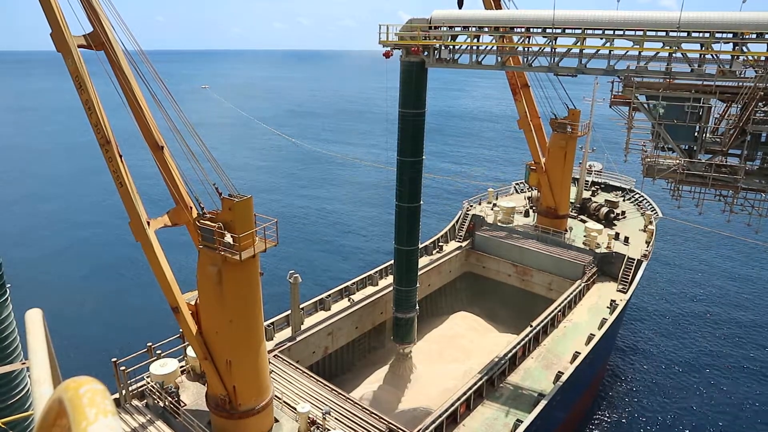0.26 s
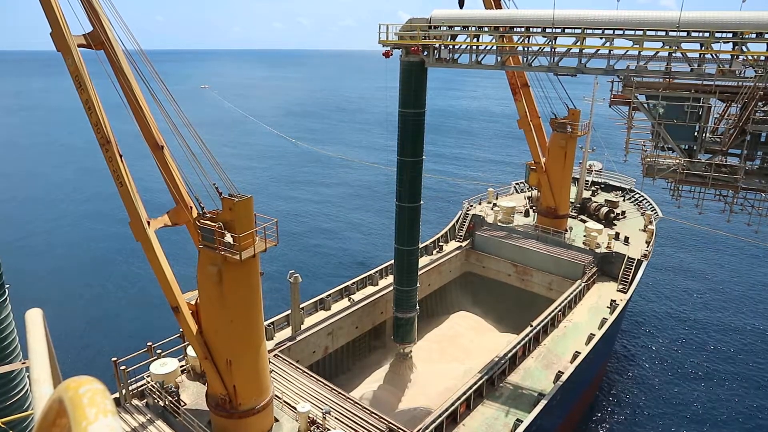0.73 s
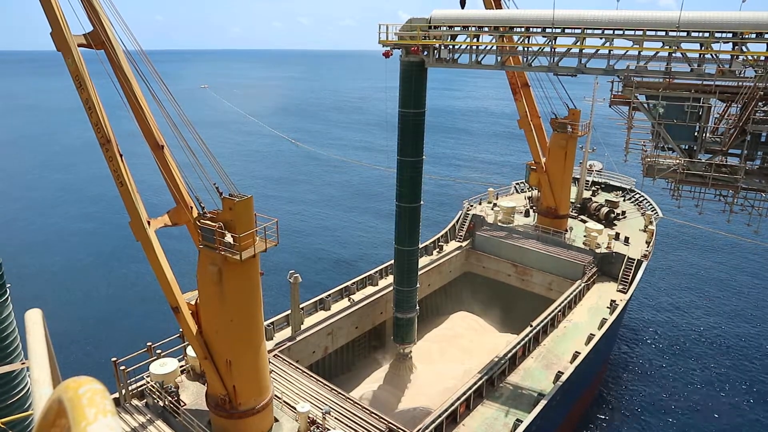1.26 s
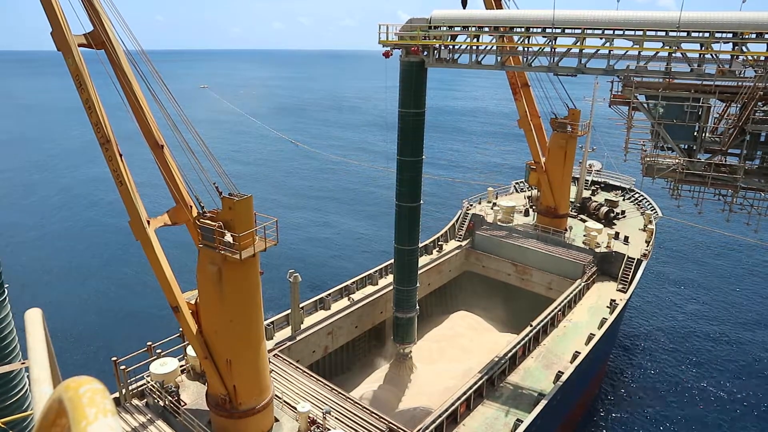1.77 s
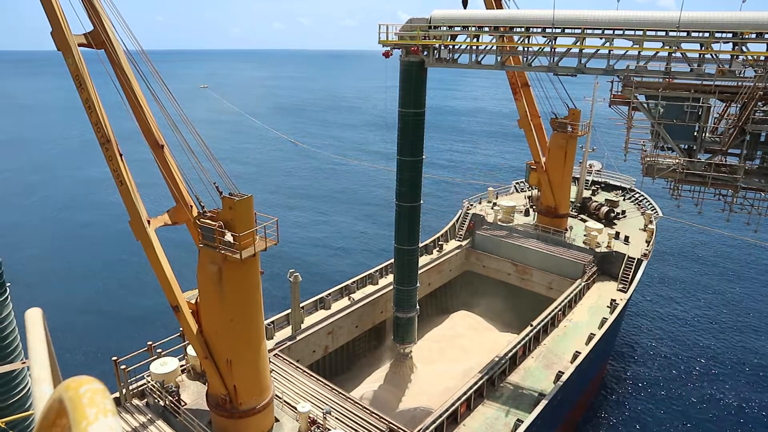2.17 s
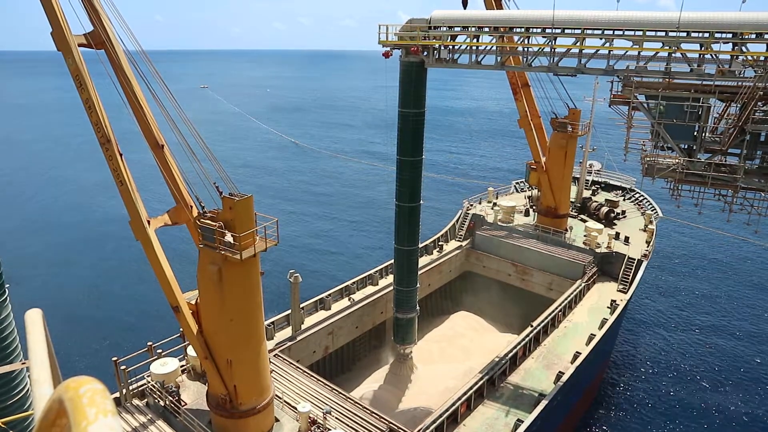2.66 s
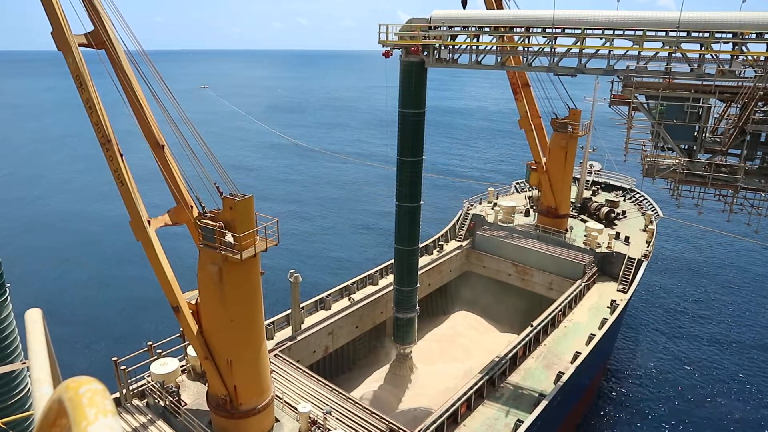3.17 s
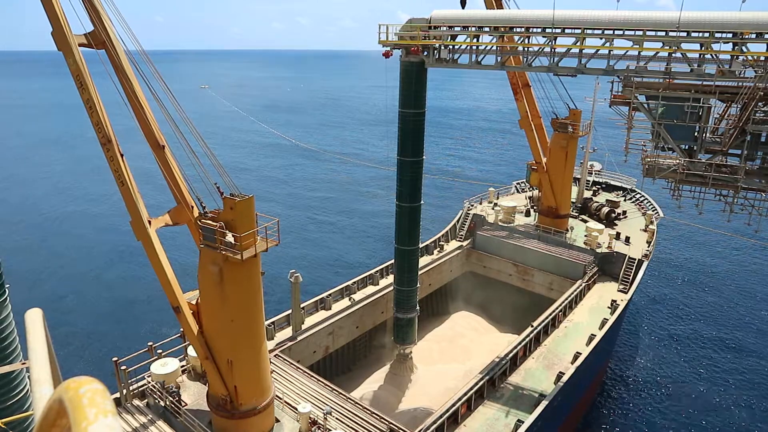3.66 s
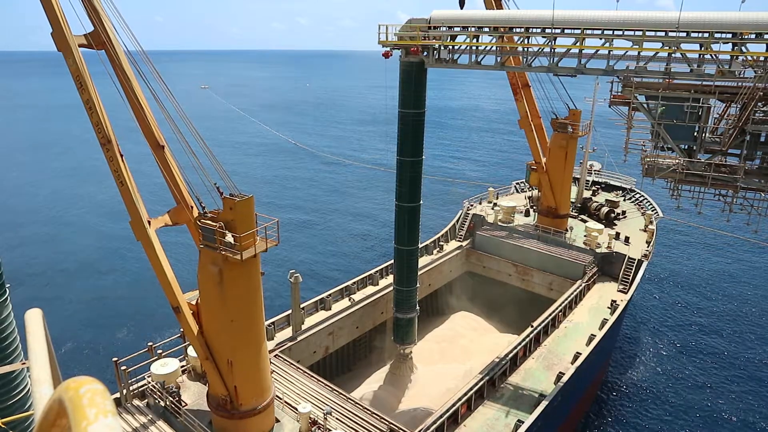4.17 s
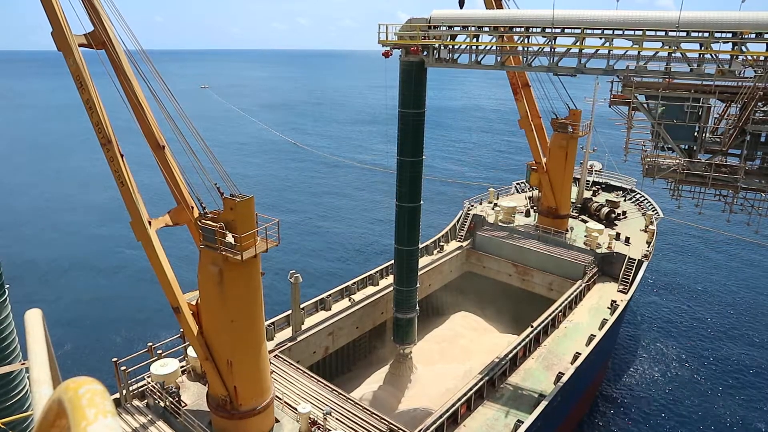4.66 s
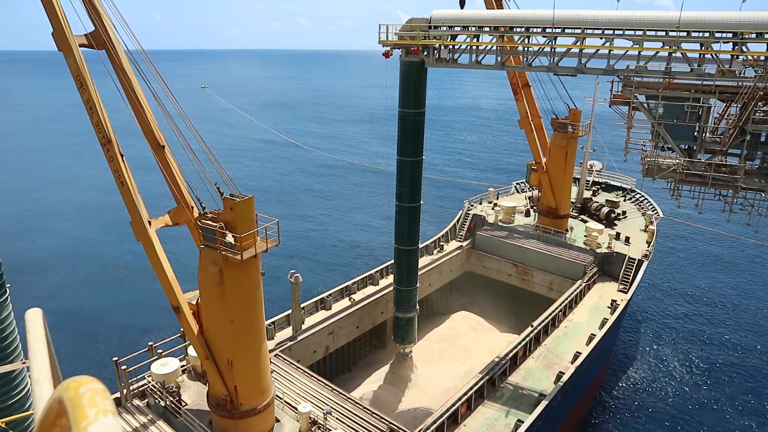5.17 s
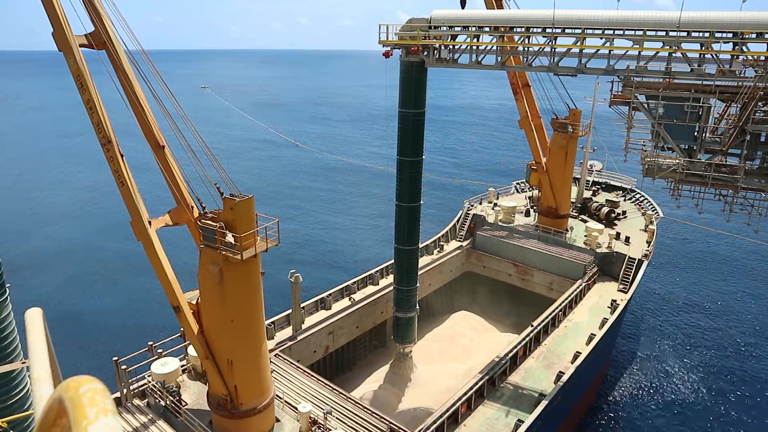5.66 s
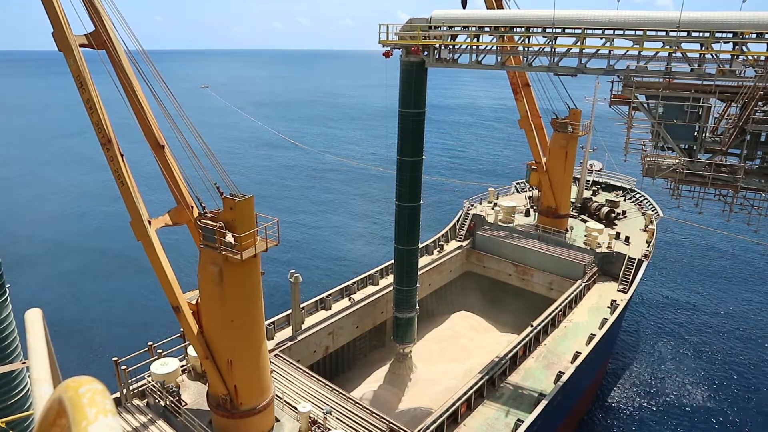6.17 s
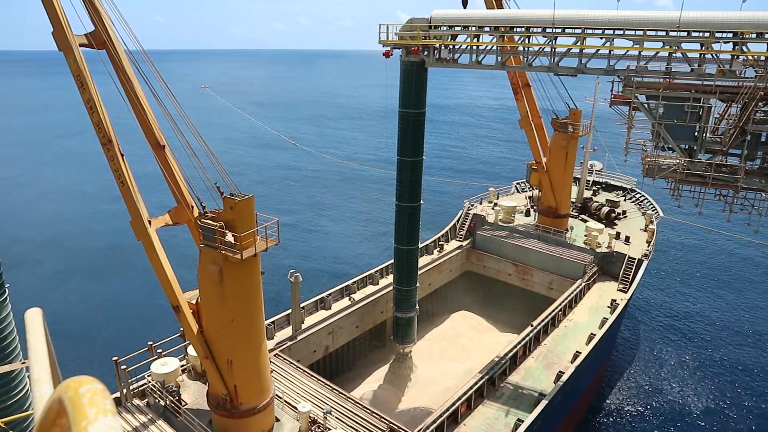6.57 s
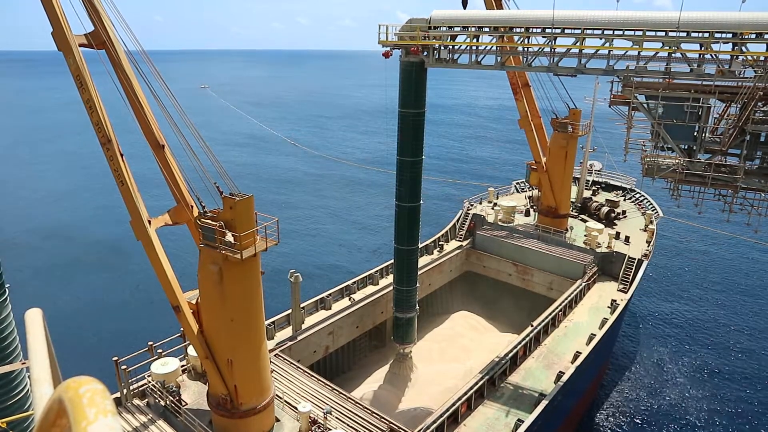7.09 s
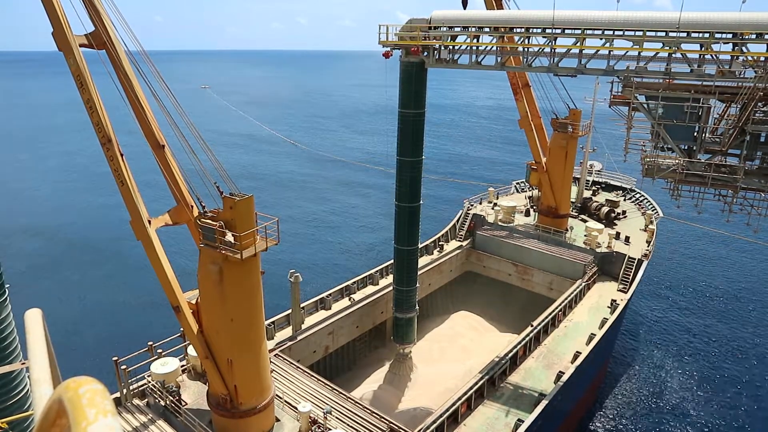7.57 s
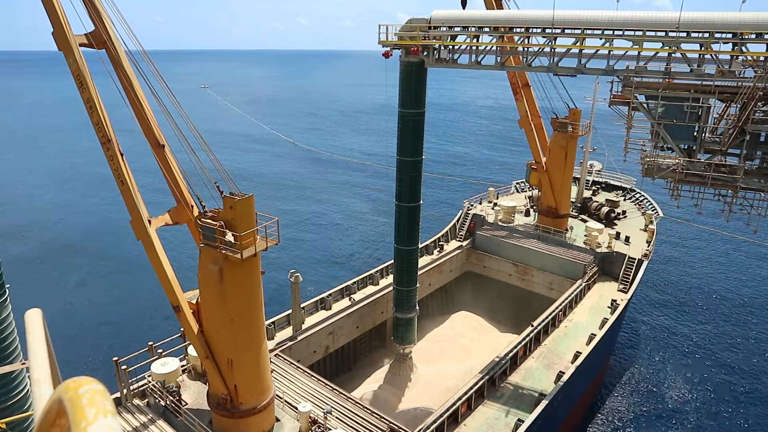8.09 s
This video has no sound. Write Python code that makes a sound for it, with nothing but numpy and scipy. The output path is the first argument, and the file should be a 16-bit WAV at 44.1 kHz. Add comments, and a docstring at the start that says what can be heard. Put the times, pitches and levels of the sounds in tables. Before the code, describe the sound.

Strong wind buffets the microphone, then eases to reveal a steady dense rush of grain pouring into a steel ship's hold, before gusts return.

```python
"""A shiploader pours bulk cargo down a chute into a steel hold, heard from high above the deck, 8.3 s.
Throughout, band-coloured grain impacts rush and ring in resonances over a conveyor drone and faint squeal.
Gusts of turbulence noise, buffets and eddy slaps open the scene and die to a light breeze by about 2.5 s.
Stray grains excite steel modes from 2.7 to 6.8 s; buffets return near 5.8 s, full gusts from 7.3 s.
The recorder's gain control turns down under strong wind, so the rush sinks, then swells back slowly."""
import sys
import numpy as np
from scipy import signal
from scipy.io import wavfile
from scipy.ndimage import uniform_filter1d

SR = 44100
rng = np.random.default_rng(int(sys.argv[2]) if len(sys.argv) > 2 else 0)


def wrap_up_sound(samples):
    """Save the sound to the file named by the first command line argument, as 16-bit audio."""
    columns = np.atleast_2d(samples).T
    # keep every value between -1 and 1, then stretch to whole-number steps
    tamed = np.clip(columns, -1, 1)
    steps = np.round(tamed * 32767).astype(np.int16)
    wavfile.write(sys.argv[1], SR, steps)


N = 367353
TIME = np.arange(N) / SR
REFERENCE_EDDY_HZ = 500


def from_db(db):
    """Decibels to amplitude gain."""
    return np.exp(np.asarray(db) * (np.log(10) / 20))


def rms_one(x):
    """Scale to rms 1."""
    return x / np.sqrt(np.mean(x ** 2) + 1e-20)


def in_time(points):
    """Read a curve at every sample."""
    time_s, value = np.transpose(points)
    return np.interp(TIME, time_s, value)


def at_hz(points, hz):
    """Read a spectrum on a log-frequency axis."""
    f, value = np.transpose(points)
    return np.interp(np.log(hz), np.log(f), value)


def drift(rate_per_s):
    """Smooth random curve, rms 1, that changes about rate_per_s times a second."""
    step = 40  # samples between computed points
    r = np.exp(-2 * np.pi * rate_per_s * step / SR)
    noise = rng.standard_normal(N // step + 2002)
    slow = signal.lfilter([1], [1, -2 * r, r * r], noise)[2000:]  # drop the filter's run-in
    return np.interp(np.arange(N) / step, np.arange(len(slow)), rms_one(slow))


def swell_of(start_s, length_s, attack_s, release_s):
    """Rounded attack, hold and release, from 0 to 1."""
    age = TIME - start_s
    ramp = np.minimum(age / attack_s, (length_s - age) / release_s)
    return np.sin(np.pi / 2 * np.clip(ramp, 0, 1))


def cut(x, hz, kind, order):
    """Butterworth low-, high- or band-pass."""
    sos = signal.butter(order, hz, kind, fs=SR, output="sos")
    return signal.sosfilt(sos, x + 1e-18)


def bands(sources, edges_hz):
    """Yield (centre Hz, width Hz, band); neighbouring bands draw on unrelated sources."""
    for k, (low, high) in enumerate(zip(edges_hz, edges_hz[1:])):
        sos = signal.butter(2, [low, high], "band", fs=SR, output="sos")
        band = signal.sosfilt(np.vstack([sos, sos]), sources[k % 2])
        yield np.sqrt(low * high), high - low, band


def resonate(x, hz, width_hz, lift_db):
    """Lift (or dip) a band by a two-pole resonance."""
    r = np.exp(-np.pi * width_hz / SR)
    zeros = np.array([1, 0, -1]) * (1 - r * r) / 2
    poles = [1, -2 * r * np.cos(2 * np.pi * hz / SR), r * r]
    return x + (from_db(lift_db) - 1) * signal.lfilter(zeros, poles, x)


def ring(clicks, hz, t60_s):
    """Decaying two-pole mode: a unit click sets a sine of height 1 ringing."""
    r = np.exp(-np.log(1000) / (t60_s * SR))
    w = 2 * np.pi * hz / SR
    return signal.lfilter([0, np.sin(w)], [1, -2 * r * np.cos(w), r * r], clicks + 1e-18)


def rumble(fade_s, lump_db, lumps_per_s):
    """Eddies larger than the microphone press on both ports alike, in spells of random lumps."""
    # slow-eddy colour: freq_hz, gain_db
    colour = [(25, -19.5), (45, -6.5), (70, 1), (100, -1), (150, -1.5), (300, -45), (1000, -100)]
    # thumping spells: start_s, length_s, level_db
    spells = [(-0.4, 2.2, -34), (3.296, 1.5, -38.5), (4.912, 2.45, -38.5)]
    edges_hz = 20 * 2 ** np.arange(0, 4.1, .5)
    noise = 0
    for hz, width_hz, band in bands(rng.standard_normal((2, N)), edges_hz):
        noise = noise + band * from_db(at_hz(colour, hz))
    strength = 0
    for start_s, length_s, level_db in spells:
        strength = strength + from_db(level_db) * swell_of(start_s, length_s, fade_s, fade_s)
    lumps = from_db(lump_db * np.minimum(drift(lumps_per_s), 1))
    return strength * rms_one(noise * lumps)


def airflow(swell_db, swell_per_s):
    """Wind strength and eddy rate: parts add in power, and the strongest dominates the rate."""
    # light breeze between gusts: time_s, level_db
    breeze = [(0, -21.5), (1.65, -14), (2.35, -19.5), (2.55, -17.5), (2.8, -32), (3.35, -27.5),
              (4.0, -49.5), (5.95, -51), (6.15, -21.5), (6.5, -23.5), (6.72, -23), (7.1, -23.5),
              (7.25, -33), (8.3, -25)]
    # gusts: start_s, length_s, attack_s, release_s, level_db, eddy_hz (at full swell and age 0)
    gusts = [(0.098, 1.534, 0.3, 0.12, -0.4, 596), (1.708, 0.5, 0.15, 0.4, 0.5, 467),
             (7.28, 0.69, 0.39, 0.4, -1.5, 437), (8.072, 0.5, 0.27, 0.14, 2, 500)]
    # single buffets: centre_s, level_db, eddy_hz, half_length_s
    buffets = [(0.014, -8.5, 204, 0.035), (0.14, -9, 160, 0.012), (0.164, -3, 330, 0.012),
               (0.186, -1, 426, 0.018), (0.217, -5, 715, 0.032), (0.287, -6, 610, 0.021),
               (0.412, -2, 710, 0.037), (0.516, -2.5, 620, 0.011), (0.603, -3.5, 680, 0.019),
               (0.67, -1.5, 597, 0.009), (1.081, -3, 520, 0.025), (1.183, 3, 553, 0.032),
               (1.283, 1, 480, 0.05), (1.383, 2.5, 485, 0.089), (1.48, 3.5, 480, 0.059),
               (1.558, 0, 350, 0.012), (1.594, -1.5, 376, 0.013), (1.822, -4, 484, 0.012),
               (1.862, 3, 500, 0.017), (1.945, 0, 470, 0.022), (1.997, -1, 560, 0.014),
               (2.026, -6, 340, 0.011), (2.099, -1, 306, 0.035), (2.174, -3.5, 390, 0.02),
               (2.228, -5.5, 277, 0.032), (2.281, -6.5, 297, 0.021), (2.322, -9, 240, 0.009),
               (2.424, -10.5, 220, 0.0084), (2.484, -13, 258, 0.0081), (2.603, -16, 246, 0.016),
               (3.179, -15.5, 220, 0.009), (3.392, -15.5, 222.3, 0.012), (3.69, -23, 75, 0.012),
               (3.848, -21, 60, 0.016), (4.143, -19, 86, 0.028), (4.338, -23, 65, 0.025),
               (4.581, -19.5, 100, 0.018), (5.255, -24, 65, 0.012), (5.35, -25, 65, 0.016),
               (5.775, -22, 80, 0.012), (5.834, -12.5, 189, 0.028), (5.886, -15, 280, 0.02),
               (5.909, -10.5, 280, 0.012), (6.085, -18, 80, 0.014), (6.267, -19.5, 100, 0.016),
               (6.356, -19, 100, 0.011), (6.478, -20, 80, 0.012), (6.595, -16, 100, 0.016),
               (6.647, -10, 190, 0.033), (6.802, -6.5, 185, 0.014), (6.896, -9.5, 170, 0.015),
               (6.927, -6.5, 140, 0.021), (6.979, -11, 229, 0.018), (7.016, -7, 204, 0.02),
               (7.122, -6.5, 206, 0.0094), (7.149, -17, 130, 0.012), (7.322, -7, 300, 0.013),
               (7.362, -5.5, 383, 0.029), (7.409, -3, 397, 0.035), (7.532, -4, 453, 0.051),
               (7.622, -2, 480, 0.008), (7.648, 0, 483, 0.011), (7.768, -7, 380, 0.01),
               (7.863, -9, 300, 0.0057), (7.794, -10.5, 320, 0.082), (7.88, -14, 270, 0.012),
               (7.91, -16, 161, 0.012), (8.002, -16, 270, 0.015), (8.109, -7, 278, 0.008),
               (8.152, -4.5, 430, 0.017)]
    breeze_eddy_hz, sag_oct_per_s = 228, 0.53
    parts = [(from_db(in_time(breeze) + swell_db * drift(swell_per_s)), breeze_eddy_hz)]
    for start_s, length_s, attack_s, release_s, level_db, eddy_hz in gusts:
        age = np.clip(TIME - start_s, 0, length_s)
        swell = swell_of(start_s, length_s, attack_s, release_s)
        sag = 2 ** (-sag_oct_per_s * age)  # a gust grows duller as it blows
        parts.append((from_db(level_db) * swell, eddy_hz * swell ** 0.34 * sag))
    for centre_s, level_db, eddy_hz, half_length_s in buffets:
        puff = np.exp(-1.7 * np.minimum(((TIME - centre_s) / half_length_s) ** 2, 20))
        parts.append((from_db(level_db) * puff, eddy_hz))
    power = sum(strength ** 2 for strength, hz in parts)
    mean_eddy_hz = sum(strength ** 2 * hz for strength, hz in parts) / power
    return np.sqrt(power), mean_eddy_hz


def wind(flutter_db, flutter_per_s, rasp_db, rasp_per_s, patchy_db):
    """Turbulence on the ports: faster air sheds smaller eddies, so the whole spectrum slides up."""
    # eddy colour: multiple_of_eddy_rate, db_per_hz
    eddy_colour = [(.04, -60), (.08, -31.5), (.2, -11.5), (.5, -3.5), (.8, 1.5), (2, 4), (3, -2.5),
                   (4, -7.5), (6, -20), (8, -32), (16, -65.5), (40, -110)]
    # port difference at the reference eddy rate: freq_hz, side_re_mid_db
    side_share = [(150, -70), (400, -36.5), (700, -22.5), (1000, -13), (2000, -2), (3000, 2), (6000, 12.5)]
    # microphone housing: freq_hz, width_hz, lift_db
    housing = [(411, 49, 3.5), (593, 1020, -4)]
    strength, eddy_hz = airflow(swell_db=1.0, swell_per_s=6.3)
    # in slower air the ports differ from a lower pitch on
    side_stretch = (REFERENCE_EDDY_HZ / eddy_hz) ** 0.18
    eddies = np.minimum(drift(rasp_per_s), 1.7)
    edges_hz = np.r_[25, 50, np.geomspace(100, 1130, 8), np.geomspace(1450, 7000, 9), 8800]
    out, total_power = 0, 0
    for hz, width_hz, (mid, side) in bands(rng.standard_normal((2, 2, N)), edges_hz):
        gain = from_db(at_hz(eddy_colour, hz / eddy_hz)) * np.sqrt(width_hz)
        # small eddies come in sharper bursts than large ones
        depth_db = rasp_db * np.sqrt(min(hz / 1000, 2.5))
        bursts = rms_one(from_db(depth_db * eddies + patchy_db * drift(39)))
        side = rms_one(side) * from_db(at_hz(side_share, hz * side_stretch))
        out = out + gain * bursts * (rms_one(mid) + np.array([side, -side]))
        total_power = total_power + gain ** 2
    for hz, width_hz, lift_db in housing:
        out = resonate(out, hz, width_hz, lift_db)
    flutter = from_db(flutter_db * drift(flutter_per_s))
    return strength * flutter * out / np.sqrt(total_power)


def crackles(level_db, decay_s, low_hz, high_hz):
    """Tiny dry snaps within the gusts: decaying noise, different at each port."""
    # snaps: start_s, level_db (before level_db and band-pass)
    snaps = [(.183, -21), (.524, -19), (.535, -24), (.599, -20), (.631, -25), (.709, -29), (.876, -30),
             (1.153, -17), (1.172, -18), (1.329, -18), (1.441, -25.5), (1.943, -21), (2.049, -29)]
    out = np.zeros((2, N))
    age = TIME[:1024]
    for start_s, snap_db in snaps:
        start = int(start_s * SR)
        snap = rng.standard_normal((2, len(age))) * np.exp(-age / decay_s)
        out[:, start:start + len(age)] += from_db(snap_db) * snap
    return from_db(level_db) * cut(out, [low_hz, high_hz], "band", order=2)


def spatter(snaps_per_s, level_db, low_hz, high_hz):
    """Fast air breaks into tiny separate snaps; the harder it blows, the more and the louder."""
    strength, eddy_hz = airflow(swell_db=1.0, swell_per_s=7.7)
    chance = snaps_per_s / SR * strength * (eddy_hz / REFERENCE_EDDY_HZ) ** 2
    snaps = (rng.random(N) < chance) * rng.standard_normal((2, N))
    return from_db(level_db) * cut(strength * snaps, [low_hz, high_hz], "band", order=4)


def slaps(level_db, cycles):
    """A strong eddy slaps the microphone: one short swing of pressure, a sine in a Gaussian envelope."""
    # slaps: centre_s, level_db (before level_db), pitch_hz
    swings = [(.162, -2, 550), (.169, -1, 503), (0.198, 13, 890), (.238, 6, 1200), (0.709, 11.5, 1200),
              (0.976, 8.5, 1150), (1.009, 8.5, 970), (1.156, 9.5, 990), (1.191, 7.5, 420), (1.304, 8, 1200),
              (1.378, 10, 895), (1.458, 11, 906), (1.818, 9, 905), (1.978, 11, 800), (2.181, 4, 700),
              (2.278, 1, 684), (2.922, -6, 480), (3.392, -5.5, 450), (5.843, -6, 396), (5.908, -10, 423),
              (6.803, -4, 300), (6.941, 0.5, 520), (7.018, -2.5, 380), (7.314, -5, 600), (7.348, 2, 600),
              (7.423, 5.5, 703), (7.554, 5, 724), (7.587, 7, 750), (7.621, 7, 836), (7.739, 5.5, 650)]
    out = np.zeros(N)
    for centre_s, swing_db, pitch_hz in swings:
        phase = (TIME - centre_s) * pitch_hz  # cycles
        near = np.abs(phase) < 4
        envelope = np.exp(-(phase[near] / cycles) ** 2)
        out[near] += from_db(swing_db) * np.sin(2 * np.pi * phase[near]) * envelope
    return from_db(level_db) * out


def conveyor(sway_db, sway_per_s):
    """Belt and rollers drone on a few unsteady pitches, narrow noise bands that sway with the load."""
    # drone: freq_hz, width_hz, rms_db
    drone = [(669, 30, -26.4), (1903, 30, -38.8), (2574, 30, -47.3), (3667, 30, -56.5)]
    out = 0
    for hz, width_hz, rms_db in drone:
        wander = drift(width_hz) + 1j * drift(width_hz)
        sway = from_db(sway_db * drift(sway_per_s))
        tone = np.real(wander * np.exp(2j * np.pi * hz * TIME))
        out = out + from_db(rms_db) * rms_one(sway * tone)
    return out


def squeal(pitch_hz, waver_hz, waver_per_s, level_db, sway_db):
    """A roller whistles faintly: a sine wavering in pitch and coming and going."""
    hz = pitch_hz + waver_hz * drift(waver_per_s) + 0.5 * waver_hz * drift(80)
    sway = from_db(sway_db * np.minimum(drift(12), 1.5))
    tone = np.sin(2 * np.pi * np.cumsum(hz) / SR) * sway
    return from_db(level_db) * rms_one(tone)


def stray_grains(level_db, scatter_db, skitter_s, scratch_db):
    """Each grain skitters with a dry scratch and strikes every steel mode at its own strength."""
    # grains: start_s, level_db (before level_db and mode gains)
    grains = [(2.7243, -60), (3.2637, -39), (3.796, -48.5), (4.0978, -39), (4.1566, -41), (4.5732, -38),
              (5.746, -37), (5.955, -27.5), (5.9765, -31), (6.0823, -30.5), (6.369, -36), (6.498, -29),
              (6.7308, -34)]
    # steel modes: freq_hz, gain_db, t60_s
    steel_modes = [(3700, -5.5, 0.004), (4630, 7, 0.005), (5350, 8.5, 0.0065), (5950, 5, 0.006),
                   (6600, 5.5, 0.005), (7500, -1.5, 0.004)]
    out = np.zeros((2, N))
    age = TIME[:2048]
    for start_s, grain_db in grains:
        start = int(start_s * SR)
        span = slice(start, start + len(age))
        contact = rng.standard_normal((2, len(age))) * np.exp(-age / skitter_s)
        contact = contact / np.linalg.norm(contact[0])
        out[:, span] += from_db(grain_db + scratch_db) * cut(contact, 3000, "high", order=2)
        for hz, mode_db, t60_s in steel_modes:
            strike_db = grain_db + mode_db + scatter_db * rng.standard_normal()
            out[:, span] += from_db(strike_db) * ring(contact, hz, t60_s)
    return from_db(level_db) * out


def stream(spectrum, grains_per_s, patchy_db):
    """Countless grain impacts of uneven size, coloured by band, leaning right; stereo, rms 1."""
    # loader stands to the right: freq_hz, right_minus_left_db
    lean = [(1300, 0), (1900, 2.3), (3500, 4), (6000, 1.8), (9000, 0)]
    impacts = (rng.random((2, N)) < grains_per_s / SR) * rng.standard_normal((2, N))
    edges_hz = np.geomspace(25, 17000, 29)
    out = 0
    for hz, width_hz, band in bands(impacts, edges_hz):
        pan = from_db(at_hz(lean, hz) * np.array([[-.5], [.5]]))
        out = out + pan * (band * from_db(at_hz(spectrum, hz) + patchy_db * drift(15)))
    return rms_one(out)


def pour(mid_db, side_db, surge_db, ring_sway_db):
    """Falling cargo surges a little and rings in chute and hold; each resonance comes and goes."""
    # mid part of the rush, added to both channels: freq_hz, db_per_hz (relative)
    mid_spectrum = [(30, -37.5), (65, -14), (130, -5.5), (230, 2), (320, 2.5), (480, 2), (800, -3.5),
                    (1180, -5), (1400, -11.5), (2100, -13), (3000, -21.5), (4200, -27.5), (5300, -36.5),
                    (7800, -42.5), (10500, -99.5)]
    # side part of the rush, added left and subtracted right: freq_hz, db_per_hz (relative)
    side_spectrum = [(200, -33), (400, -51.5), (1400, -37), (1950, 8.5), (3000, 6.5), (4500, 5.5),
                     (7000, 2), (10000, -2.5), (13000, -4), (15500, -2.5)]
    # rush level: time_s, level_db
    rush_level = [(0, -1), (1.7, -0.6), (2.6, -0.6), (3.3, -1.2), (3.8, 0.25), (4.5, -0.5), (5.7, 0),
                  (6.7, -0.5), (7.25, 0), (8.3, -0.5)]
    # chute and hold resonances: freq_hz, width_hz, lift_db (mean)
    resonances = [(337, 45, 0.5), (436, 30, 2.5), (506, 45, 4.5), (556, 17, -1), (835, 48, 8.5),
                  (919, 14, 4), (1040, 25, 4), (1111, 57, 6.5), (1181, 26, 1), (1257, 79, -2),
                  (1642, 32, 6), (1780, 91, 3.5), (1845, 15, 5), (2135, 71, 9), (2320, 30, 4),
                  (2680, 140, 6), (3006, 52, 3), (3110, 150, -1.5), (3404, 110, 7), (3870, 56, 3.5),
                  (4140, 130, 2.5), (4560, 110, 4.5), (4980, 250, -3), (5480, 240, 7.5), (6550, 500, 1.5)]
    ring_sways_per_s = 4
    mid = from_db(mid_db) * stream(mid_spectrum, grains_per_s=9000, patchy_db=1.36)
    side = from_db(side_db) * stream(side_spectrum, grains_per_s=20000, patchy_db=1.3)
    surge = from_db(in_time(rush_level) + surge_db * drift(27))
    out = (mid + side * [[1], [-1]]) * surge
    for hz, width_hz, lift_db in resonances:
        out = resonate(out, hz, width_hz, lift_db + ring_sway_db * drift(ring_sways_per_s))
    return out


def gain_control(x):
    """Recorder gain: turns down quickly above the threshold, then recovers at a steady rate."""
    threshold_db, window_s, attack_s, recovery_db_per_s = -16, 0.078, 0.054, 10.5
    power = uniform_filter1d(np.mean(x ** 2, axis=0), int(window_s * SR))
    level_db = 10 * np.log10(np.maximum(power, 1e-12))
    excess_db = np.maximum(level_db - threshold_db, 0)
    # running maximum on a rising ramp = hold that falls at the recovery rate
    recovered_db = recovery_db_per_s * TIME
    held_db = np.maximum.accumulate(excess_db + recovered_db) - recovered_db
    r = np.exp(-1 / (attack_s * SR))
    reduction_db, _ = signal.lfilter([1 - r], [1, -r], held_db, zi=[r * held_db[0]])
    return x * from_db(-reduction_db)


def scene():
    """Loader below, wind at the microphone."""
    loader = pour(mid_db=-21.0, side_db=-45.5, surge_db=0.4, ring_sway_db=1.2)
    loader = loader + conveyor(sway_db=1.8, sway_per_s=3)
    loader = loader + squeal(pitch_hz=4160, waver_hz=55, waver_per_s=3, level_db=-54.5, sway_db=7)
    ticks = stray_grains(level_db=-0.5, scatter_db=1.0, skitter_s=0.006, scratch_db=24)
    ticks = cut(ticks, 7800, "low", order=10)  # the ticks stay below about 8 kHz
    gusts = wind(flutter_db=0.5, flutter_per_s=45, rasp_db=2.25, rasp_per_s=170, patchy_db=1.9)
    gusts = cut(gusts, 105, "high", order=2)  # small ports pass little of the gusts' bass
    gusts = gusts + crackles(level_db=2, decay_s=0.0015, low_hz=2200, high_hz=6000)
    gusts = gusts + spatter(snaps_per_s=45, level_db=15, low_hz=1000, high_hz=3100)
    lumps = rumble(fade_s=0.24, lump_db=5.5, lumps_per_s=8)
    return loader + ticks + gusts + lumps + slaps(level_db=3.0, cycles=0.48)


def record(dry):
    """Gain control rides the level, the highest peaks are rounded and the top is cut."""
    levelled = gain_control(dry)
    rounded = levelled / (1 + levelled ** 12) ** (1 / 12)
    low_pass = signal.cheby2(14, 70, 16600, fs=SR, output="sos")  # 70 dB down from 16600 Hz up
    return signal.sosfilt(low_pass, rounded)


dry = scene()
out = record(dry)
wrap_up_sound(out)
```